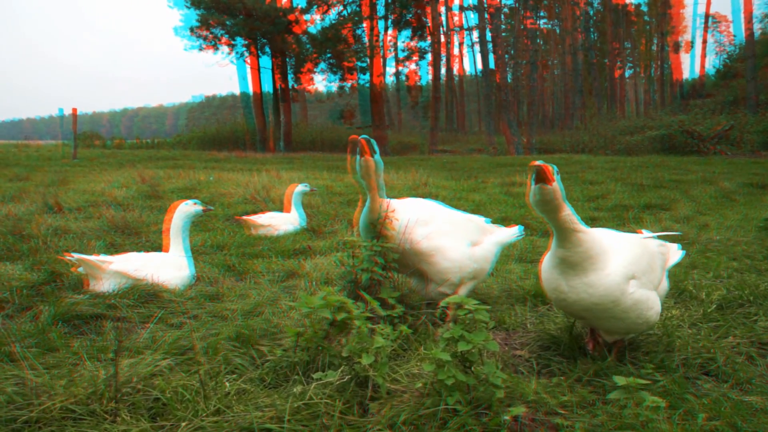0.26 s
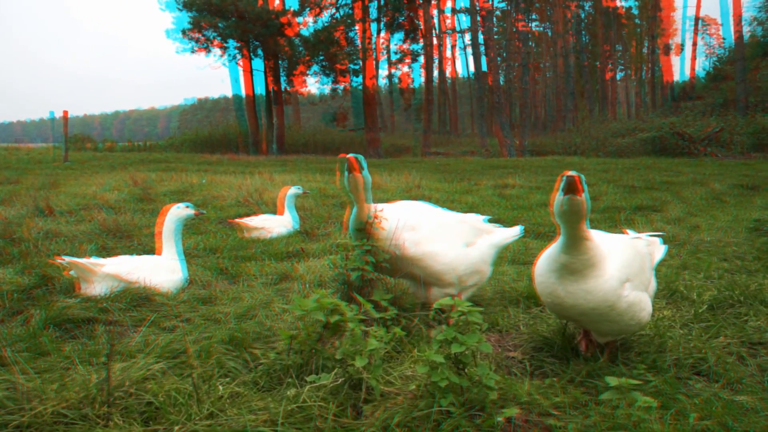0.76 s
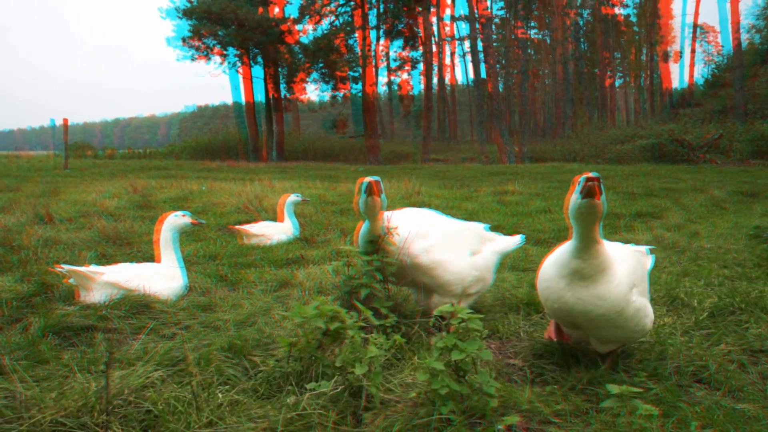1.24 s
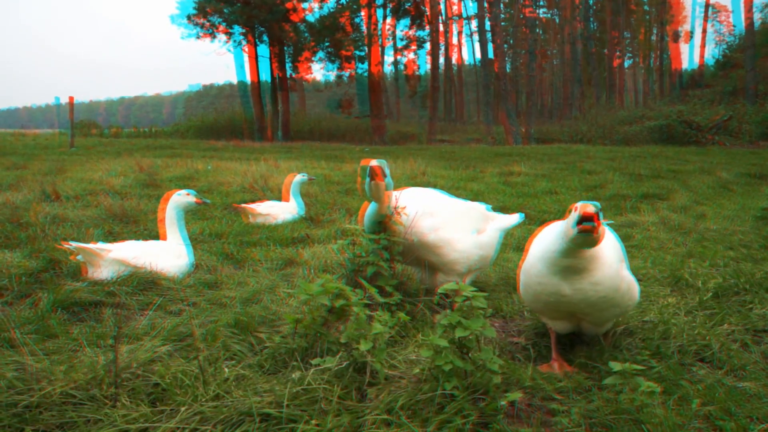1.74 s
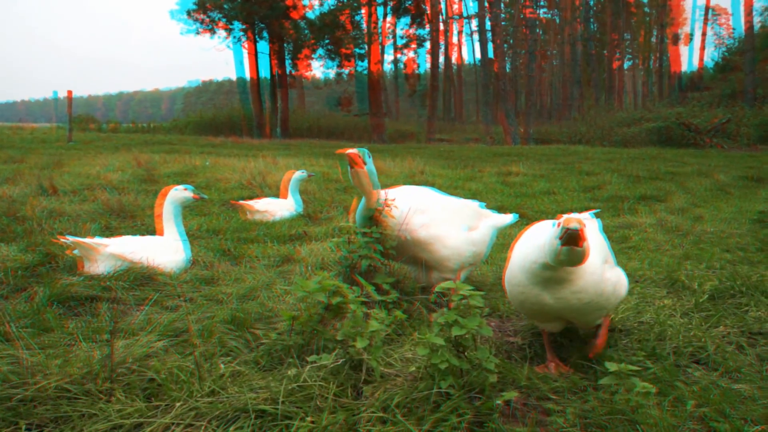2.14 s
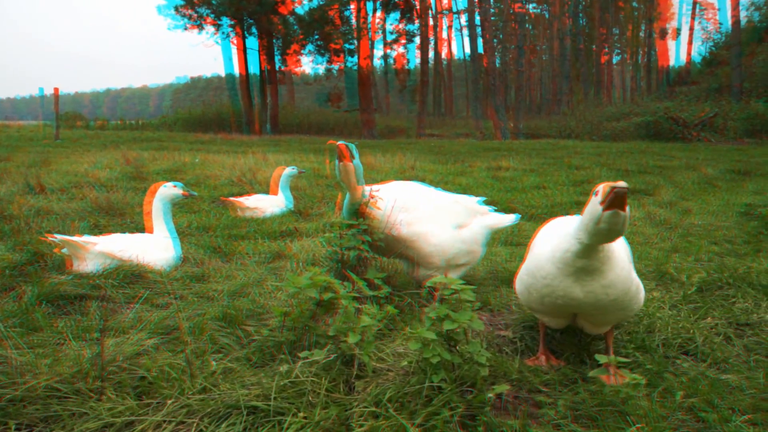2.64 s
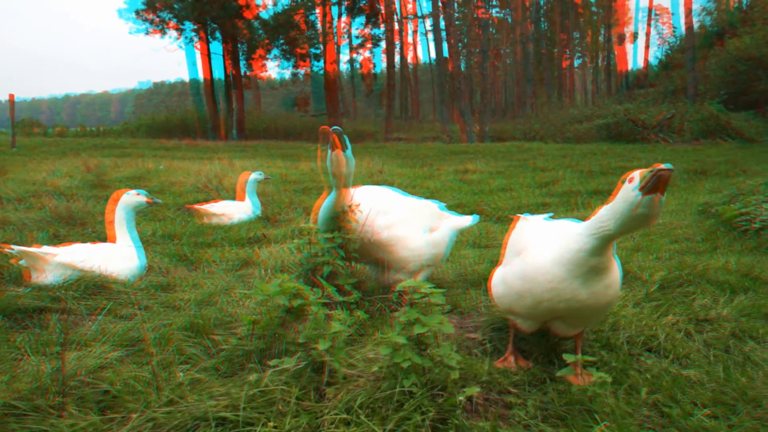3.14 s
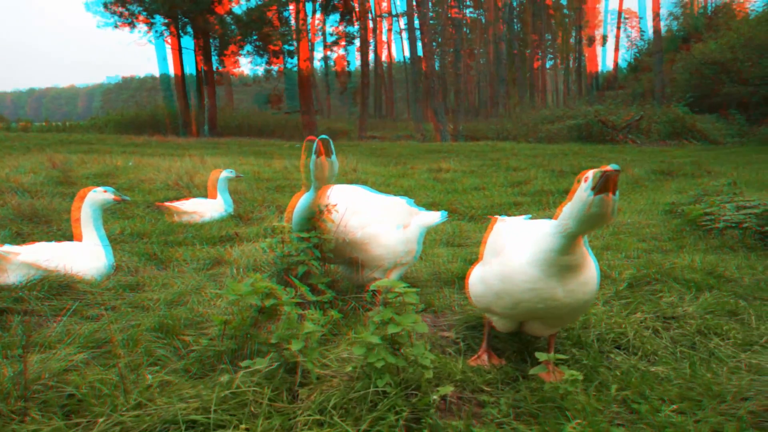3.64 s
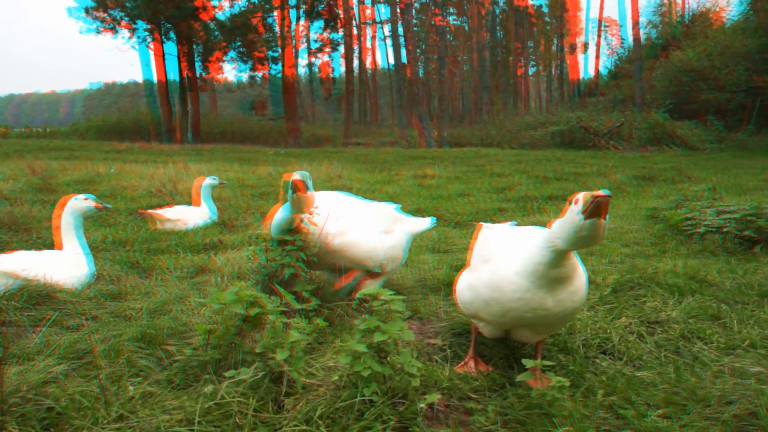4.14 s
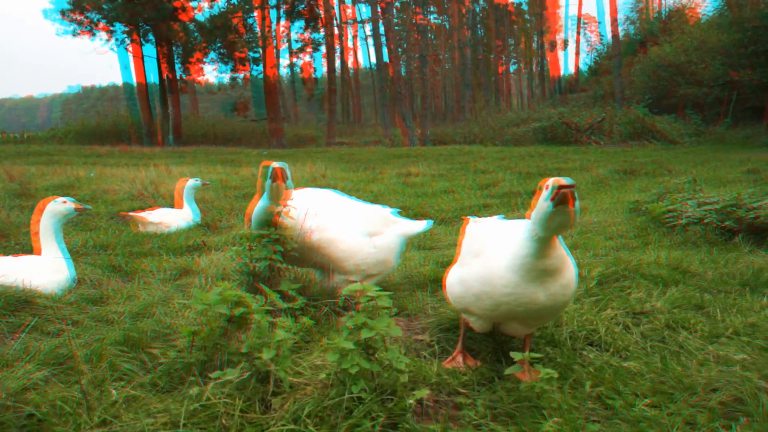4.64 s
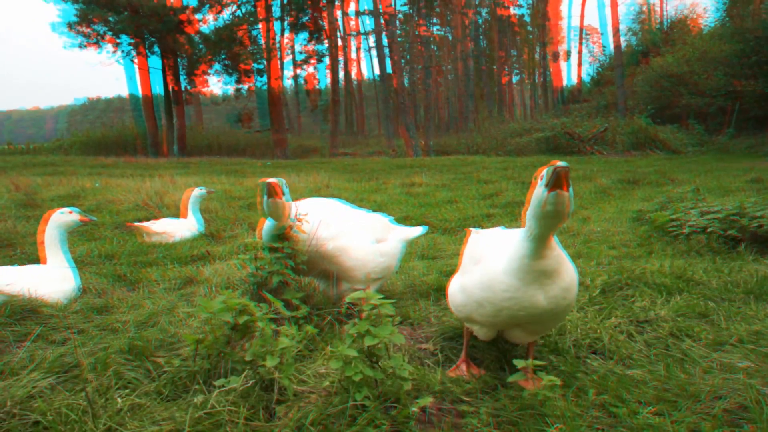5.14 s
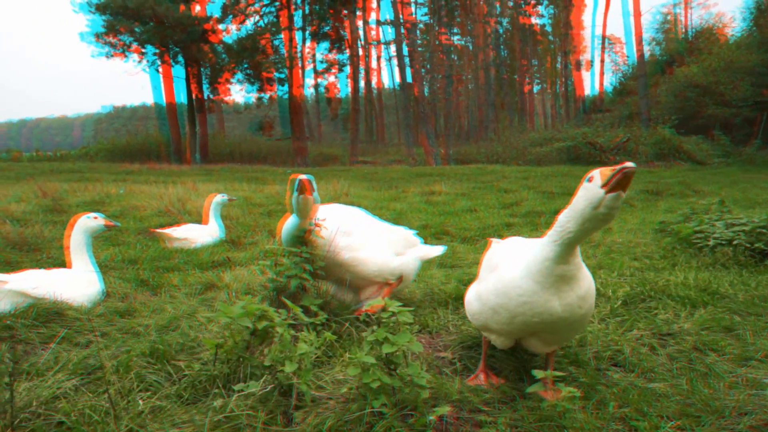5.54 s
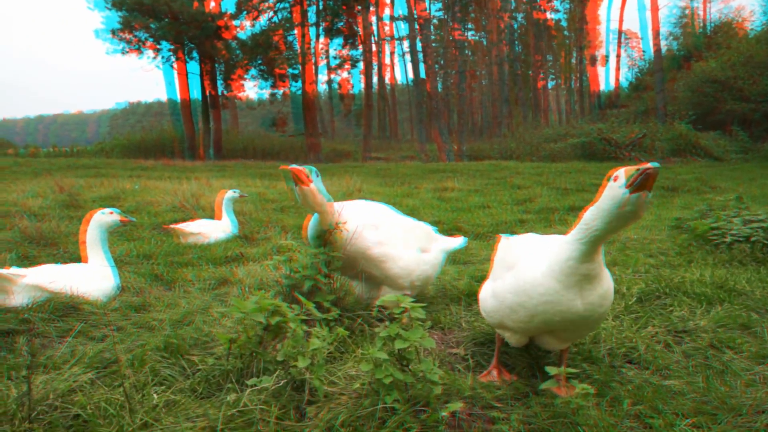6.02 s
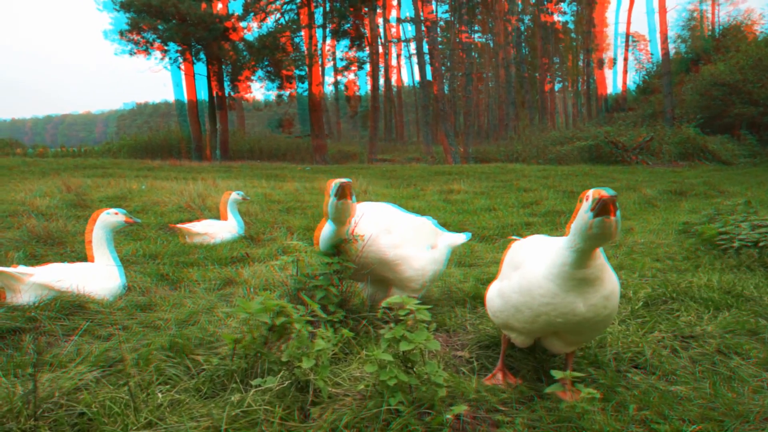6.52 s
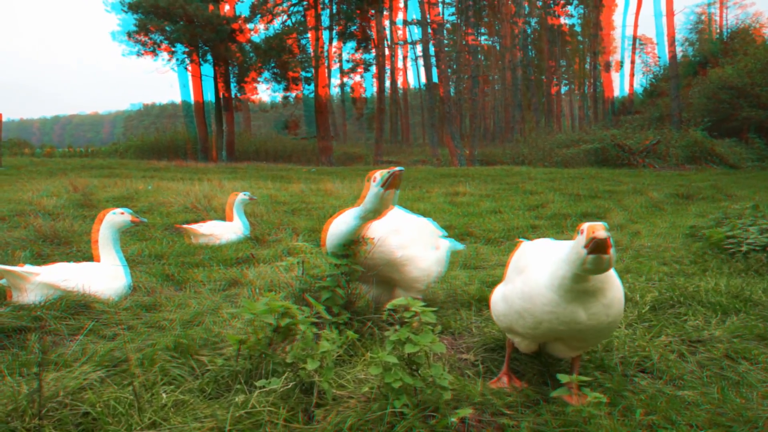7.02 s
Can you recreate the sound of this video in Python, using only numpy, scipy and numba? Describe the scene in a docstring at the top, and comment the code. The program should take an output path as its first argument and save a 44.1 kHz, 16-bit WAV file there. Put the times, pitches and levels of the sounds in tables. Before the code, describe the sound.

Geese in a meadow beside woods, heard close in stereo with a very soft rush of air. At 0 s a clipped yelp, then a hoarse rough bark at 0.15 s. Near quiet follows, with faint far falling bird cries around 0.4, 0.75 and 1.1 s and thin high whistles. A dry stalk snaps at 1.4 s, and low honks and a yelp start a dense cackle lasting to about 3.2 s: buzzy, nasal, short honks, the nearest goose right, a lower voice near centre, with small squeaks. Then quiet, faint bird notes at 3.4 s, soft crackles near 4 s, and complete silence from 4.2 to 4.8 s. The second bout begins with softer left calls, then rapid overlapping honks, squeaks at 6.05 and 6.3 s, a harsh shriek at 6.5 s, strong lower honks until 6.95 s, a last yelp near 7.1 s and a distant bird cry at the end.

```python
"""Geese cackling at the edge of a wood

Domestic geese honk in two bouts: the nearest on the right about seven times a second, a lower voice in the
middle, a softer one on the left, and one hoarse bark. Each honk is a train of pulses and puffs that rings
throat resonances. Voices that break into yelps, squeaks or a shriek, and far birds, are sums of overtones.
Crackles and the rush of air are coloured noise; trees echo. Between the bouts the sound fades to silence."""
import sys
import numpy as np
from scipy import signal
from scipy.fft import rfft, irfft
from scipy.io import wavfile
from numba import njit

SR = 44100
rng = np.random.default_rng(int(sys.argv[2]) if len(sys.argv) > 2 else 0)


def master_out(mix):
    """Clip the mix to full scale and print it as 16-bit PCM to the path in sys.argv[1]."""
    frames = np.transpose(np.atleast_2d(mix))
    ceiling = np.clip(frames, -1, 1)
    pcm = np.round(ceiling * 32767).astype(np.int16)
    wavfile.write(sys.argv[1], SR, pcm)


N = 320607   # length in samples
CUTOFF_HZ = 16200   # nothing is kept above this


def from_db(db):
    """Turn decibels into a gain."""
    return 10 ** (np.asarray(db) / 20)


def rms_one(x):
    """Scale to unit power."""
    return x / np.sqrt(np.mean(x ** 2) + 1e-20)


def in_time(rows):
    """Join (seconds, value) rows by straight lines."""
    return np.interp(np.arange(N) / SR, *np.transpose(rows))


def noise(spectrum, size):
    """Noise of unit power whose colour follows (Hz, dB) rows."""
    hz, db = np.transpose(spectrum)
    bins = np.maximum(np.fft.rfftfreq(size, 1 / SR), 1)
    colour_db = np.interp(np.log(bins), np.log(hz), db)
    white = rng.standard_normal(size)
    return rms_one(irfft(rfft(white) * from_db(colour_db), size))


def wander(size, rate):
    """Random values around 0, drawn `rate` times a second and joined by straight lines."""
    at = np.arange(size) * rate / SR
    return np.interp(at, np.arange(400), rng.standard_normal(400))


def add(out, start, sound, pan_db):
    """Mix a sound into the stereo track at its time and side; positive pan_db is left."""
    at = round(start * SR) + np.arange(len(sound))
    inside = (at >= 0) & (at < N)
    sides = from_db([[pan_db / 2], [-pan_db / 2]])
    out[:, at[inside]] += sides / sides.mean() * sound[inside]


@njit
def resonate(x, hz, width, sr):
    """A resonance of peak gain about 1 whose centre can move from sample to sample."""
    r = np.exp(-np.pi * width / sr)
    y = np.zeros(len(x))
    for i in range(2, len(x)):
        push = (1 - r * r) / 2 * (x[i] - x[i - 2])
        y[i] = push + 2 * r * np.cos(2 * np.pi * hz[i] / sr) * y[i - 1] - r * r * y[i - 2]
    return y


def arch(u, crest_hz, final_hz, scoop, crest_at=.25):
    """Pitch scoops up over the first part of a call (u runs 0 to 1), then sags ever faster."""
    crest_at = np.clip(crest_at, .1, .7)
    up = np.clip(1 - u / crest_at, 0, 1)
    down = np.clip((u - crest_at) / (1 - crest_at), 0, 1)
    return crest_hz * (1 - scoop * up ** 2) - (crest_hz - final_hz) * down ** (3 / 2)


def swell(t, length, rise, fall):
    """Rounded attack and release, with times in seconds."""
    attack = np.sin(np.pi / 2 * np.clip(t / rise, 0, 1)) ** 2
    release = np.sin(np.pi / 2 * np.clip((length - t) / fall, 0, 1)) ** 2
    return attack * release


def near_goose():
    """The nearest goose, on the right, has the highest pulse rate of the honking voices."""
    # Each row: start in seconds, length in seconds, level in dB before attack and release.
    honks = [(1.858, 0.13, -25.5), (2.002, 0.12, -25), (2.151, 0.13, -22), (2.312, .111, -22),
             (2.424, 0.12, -21), (2.54, .14, -20), (2.676, .13, -20.5), (2.834, .11, -20),
             (3.067, 0.11, -23), (4.966, 0.1425, -19), (5.16, 0.13, -21), (5.276, 0.15, -20),
             (5.43, 0.14, -21), (5.553, .14, -20.5), (5.7, .143, -20.5), (5.824, 0.14, -21),
             (6.091, .129, -20), (6.238, 0.1, -21.5), (6.35, 0.099, -21.5), (6.522, 0.064, -30.5),
             (6.747, 0.11, -22), (6.937, 0.078, -21.5)]
    # Pitch at the crest and its sag, the honk length with the usual beak opening, attack and release.
    shape = dict(crest_hz=162.35, sag_hz_per_s=115, usual_s=0.18, attack_s=0.015, release_s=0.026)
    # Throat resonances. Each row: centre in Hz, width in Hz, drive in dB, share of beak movement from 0 to 1.
    throat = [(165, 33, -9, 0), (506, 18.2, 3.5, 0.3), (944.5, 137, 0, 0.43), (1136.6, 61, 0, 0.33),
              (1885, 110, -3.5, 0.21), (2280, 110, -5.5, 0.4), (2740, 137, -4.5, 0), (3395, 42.6, -9, 0.2),
              (4346, 160, -9.5, 0.29), (5700, 1340, -20, 1), (6570, 160, -21, 0.4), (7820, 170, -19.5, 0),
              (11210, 2200, -36, 0.05)]
    return goose(honks, shape, throat, beak_hz=1172, pan_db=-9.0, jitter=.007, edge_jitter=.05,
                 rasp=1.0, closing=.3, dull_db=-15, shimmer_db=0.55, rasp_cycles=1.0, rasp_hz=4770,
                 rebound=0.67, shut_db=-1.0)


def middle_goose():
    """A lower voice near the middle has stronger, shorter puffs and a less mobile beak than the nearest."""
    # Each row: start in seconds, length in seconds, level in dB before attack and release.
    honks = [(1.443, 0.049, -28.5), (1.708, 0.059, -37), (1.745, 0.078, -21.5), (1.805, 0.12, -21.5),
             (1.913, 0.13, -22.5), (2.015, 0.1, -22.5), (2.108, 0.11, -25), (2.29, .07, -25),
             (2.402, 0.063, -25), (2.529, 0.064, -29), (2.657, 0.07, -30), (2.945, .06, -22.5),
             (2.992, 0.11, -21), (3.087, 0.11, -27.5), (5.081, 0.078, -26.5), (5.157, 0.15, -24.5),
             (5.375, 0.12, -25), (5.478, 0.12, -26), (5.588, .09, -27), (5.666, 0.11, -23.5),
             (5.77, 0.11, -25), (5.947, 0.064, -28), (6.075, 0.052, -27.5), (6.32, 0.052, -28),
             (6.603, 0.065, -21.5), (6.656, 0.12, -19.5), (6.753, 0.12, -22.5), (6.844, 0.11, -20.5)]
    # Pitch at the crest and its sag, the honk length with the usual beak opening, attack and release.
    shape = dict(crest_hz=138.04, sag_hz_per_s=50, usual_s=0.094, attack_s=0.012, release_s=.02)
    # Throat resonances. Each row: centre in Hz, width in Hz, drive in dB, share of beak movement from 0 to 1.
    throat = [(163, 35, -4, 0), (427.3, 13, -6.5, 0.32), (576, 120, -6.5, 0.21), (733, 67, -6.5, 0.58),
              (832.4, 104, 1.5, 0.97), (963, 94, -17.5, 1), (1540, 100, -5, 0.55), (2091, 120, -5, 0.15),
              (2579, 100, -11, 0.4), (3745, 470, -14.5, .2), (5720, 3140, -26, 0.98), (7200, 900, -42, 1),
              (10970, 2900, -39.5, 0.23)]
    return goose(honks, shape, throat, beak_hz=834.0, pan_db=-2, jitter=.008, edge_jitter=.025,
                 rasp=2.4, closing=0.18, dull_db=-15.5, shimmer_db=0.94, rasp_cycles=0.55, rasp_hz=3260,
                 rebound=0.6, shut_db=-1.0)


def left_goose():
    """Softer nasal calls from the left, with strong puffs and a pitch that is rough throughout."""
    # Each row: start in seconds, length in seconds, level in dB before attack and release.
    honks = [(4.785, 0.051, -44), (4.82, 0.064, -28), (4.862, 0.14, -28), (4.965, 0.11, -27),
             (5.103, 0.074, -26.5), (5.377, 0.11, -27.5), (7.098, 0.068, -34), (7.177, 0.0357, -26.5)]
    # Pitch at the crest and its sag, the honk length with the usual beak opening, attack and release.
    shape = dict(crest_hz=155.9, sag_hz_per_s=48.5, usual_s=0.095, attack_s=0.017, release_s=0.014)
    # Throat resonances. Each row: centre in Hz, width in Hz, drive in dB, share of beak movement from 0 to 1.
    throat = [(173, 56, -7.5, 0), (631, 18, 5, 0), (956, 300, 1, 1), (1488, 110, 2, 0.95),
              (1587, 180, -2, 0.59), (2310, 530, -15, 0), (3580, 420, -17, 0), (7760, 370, -43.5, 0),
              (10100, 990, -37.5, 0)]
    return goose(honks, shape, throat, beak_hz=1063, pan_db=5.0, jitter=0.0523, edge_jitter=0.021,
                 rasp=3.4, closing=0.11, dull_db=0, shimmer_db=1.0, rasp_cycles=1.0, rasp_hz=2960,
                 rebound=0.63)


def hoarse_bark():
    """One hoarse bark: rough pulses of very uneven strength, with weak rebounds."""
    # Each row: start in seconds, length in seconds, level in dB before attack and release.
    barks = [(.151, .07, -27.5)]
    # Pitch at the crest and its sag, the bark length with the usual beak opening, attack and release.
    shape = dict(crest_hz=131.3, sag_hz_per_s=100, usual_s=.07, attack_s=0.03, release_s=0.033)
    # Throat resonances. Each row: centre in Hz, width in Hz, drive in dB, share of beak movement from 0 to 1.
    throat = [(381, 18, 1, 0.041), (543, 28, 5.5, 0), (757, 100, -1, .3), (1470, 450, -10, 0.03),
              (1990, 64, -5, 0.05), (2470, 180, -7.5, 0.066), (3750, 330, -11, 0), (6650, 980, -21, 0),
              (9650, 3800, -29, 0)]
    return goose(barks, shape, throat, beak_hz=775, pan_db=2, jitter=.04, edge_jitter=0.056,
                 rasp=2.2, closing=0.19, dull_db=-17, shimmer_db=2.5, rasp_cycles=1.0, rasp_hz=1478,
                 rebound=0.36)


def goose(honks, shape, throat, beak_hz, pan_db, jitter, edge_jitter, rasp, closing, dull_db, shimmer_db,
          rasp_cycles, rasp_hz, rebound, shut_db=0):
    """Pulses ring in the windpipe; the opening beak lifts and brightens its resonances over each honk."""
    beak_widening = 0.092   # a longer honk opens the beak wider: resonances rise with this power of length
    out = np.zeros((2, N))
    for start, length, level_db in honks:
        t = np.arange(int(length * SR)) / SR
        u = t / t[-1]
        # how far the beak is shut: 1 at either end, near 0 in the middle
        shut = np.clip(1 - u / 0.46, 0, 1) ** 2 + np.clip((u - .45) / 0.42, 0, 1) ** 2
        shift = (length / shape["usual_s"]) ** beak_widening * (1 - closing * shut)
        final_hz = shape["crest_hz"] - shape["sag_hz_per_s"] * length
        pitch = arch(u, shape["crest_hz"], final_hz, .08)
        rough = jitter + edge_jitter * shut   # rougher at either end than at the crest
        slaps, puffs = syrinx(pitch, rough, shimmer_db, rasp, rasp_cycles, beak_hz * shift, rebound)
        voice = windpipe(slaps, puffs, throat, shift, dull_db * shut, rasp_hz)
        voice = rms_one(voice * from_db(shut_db * shut))
        voice = voice * swell(t, length, shape["attack_s"], shape["release_s"])
        add(out, start, from_db(level_db) * voice, pan_db)
    return out


def syrinx(pitch, rough, shimmer_db, rasp, rasp_cycles, flutter_hz, rebound, count=4):
    """Each cycle the membranes slap shut and rebound, ever weaker, and let out a puff of turbulent air."""
    size = len(pitch)
    phase = np.cumsum(pitch * (1 + rough * wander(size, 170))) / SR + .7   # in cycles
    slaps = np.zeros(size)
    for k in range(count):
        # the time each rebound takes wavers
        bounce = phase - k * pitch / flutter_hz * (1 + 0.055 * wander(size, 120))
        at = np.flatnonzero(np.diff(np.floor(bounce)) > 0)
        # share each slap between two samples, as it falls between them
        late = (np.ceil(bounce[at]) - bounce[at]) / (bounce[at + 1] - bounce[at])
        slaps[at] += (1 - late) * rebound ** k
        slaps[at + 1] += late * rebound ** k
    puffs = rng.standard_normal(size) * np.exp(-(phase % 1) / rasp_cycles)
    strength = from_db(shimmer_db * wander(size, 150))
    return rms_one(slaps) * strength, rasp * rms_one(puffs) * strength ** 2


def windpipe(slaps, puffs, throat, shift, shade_db, rasp_hz):
    """Slaps and puffs ring every throat resonance; the bending neck makes the upper ones waver."""
    size, voice = len(slaps), 0
    for hz, width, db, share in throat:
        # turbulence and the beak's shading act mostly on the upper resonances
        treble = hz / (hz + rasp_hz)
        drive = (slaps + treble * puffs) * from_db(db + shade_db * treble)
        lowpass = signal.butter(2, min(3.52 * hz, .4 * SR), fs=SR, output="sos")
        drive = signal.sosfilt(lowpass, drive)
        # upper resonances waver in pitch and strength, and answer up to 2 ms late
        bend = hz ** 2 / (hz ** 2 + 2500 ** 2)
        delay = int(rng.uniform(0, .002) * bend * SR)
        drive = np.roll(drive, delay) * from_db(3 * bend * wander(size, 35))
        centre = hz * shift ** share * (1 + .03 * bend * wander(size, 25))
        voice = voice + resonate(drive, centre, float(width), SR)
    return voice


def windpipe_hollow(x, hz, q):
    """A pipe closed at one end swallows the octave of its lowest resonance."""
    return signal.lfilter(*signal.iirnotch(hz, q, fs=SR), x)


def breaking_voices():
    """A goose jumps to its high register: a sagging yelp, a short squeak or an arched shriek."""
    # Clear yelps. Each row: start in seconds, length in seconds, level in dB before attack and release,
    # crest pitch in Hz, left-right balance in dB, beak resonance in Hz.
    yelps = [(-.04, 0.094, -36, 543.6, 3.5, 1184), (1.523, 0.089, -24, 427, -3, 787),
             (2.28, 0.049, -28.5, 564.6, -1.5, 608), (2.399, .052, -27.5, 585, -3, 603),
             (7.135, 0.11, -30, 494, 3.5, 980)]
    # Whistling squeaks as a voice catches.
    # Each row: start in seconds, level in dB before attack and release, left-right balance in dB.
    squeaks = [(1.732, -26, 6), (2.936, -27, 8), (6.051, -19, -4.5), (6.305, -19, -4)]
    # A harsh, arched shriek. Each row: start in seconds, length in seconds,
    # level in dB before attack and release, crest pitch in Hz, left-right balance in dB.
    shrieks = [(6.501, 0.073, -21, 810, -10)]
    out = np.zeros((2, N))
    for start, length, level_db, hz, pan_db, beak_hz in yelps:
        yelp = clear_tone(length, hz, sag=.13, scoop=.07, slope_db=-5.0, jitter=.016, flutter=0.078,
                          attack_s=0.028, release_s=.027, beak_hz=beak_hz, beak_db=16)
        add(out, start, from_db(level_db) * yelp, pan_db)
    for start, level_db, pan_db in squeaks:
        squeak = clear_tone(0.045, 2056, sag=0.016, scoop=0.015, slope_db=-15.5, jitter=0.0066, flutter=0.21,
                            attack_s=0.035, release_s=.026)
        add(out, start, from_db(level_db) * squeak, pan_db)
    for start, length, level_db, hz, pan_db in shrieks:
        shriek = clear_tone(length, hz, sag=.08, scoop=0.169, slope_db=-3.5, jitter=.016, flutter=0.34,
                            attack_s=0.019, release_s=.028, beak_hz=800, beak_db=-2.5, crest_at=0.49)
        add(out, start, from_db(level_db) * shriek, pan_db)
    return out


def clear_tone(length, crest_hz, sag, scoop, slope_db, jitter, flutter, attack_s, release_s,
               beak_hz=0, beak_db=0, beak_width_hz=150, waver=0, crest_at=.33):
    """A nearly periodic tone: overtones weaken upwards, and the beak lifts or dims those near beak_hz."""
    t = np.arange(int(length * SR)) / SR
    pitch = arch(t / t[-1], crest_hz, crest_hz * (1 - sag), scoop, crest_at)   # sag: share of the pitch lost
    pitch = pitch * (1 + jitter * wander(len(t), 680) + waver * wander(len(t), 25))
    phase, voice = 2 * np.pi * np.cumsum(pitch) / SR, 0
    for k in range(1, int(CUTOFF_HZ / crest_hz) + 1):
        lift_db = beak_db / (1 + ((k * pitch - beak_hz) / beak_width_hz) ** 2)
        gain = from_db(slope_db * np.log2(k) + lift_db)   # slope_db per octave
        gain = gain / (1 + (k * crest_hz / 5500) ** 3)
        uneven = 1 + flutter * np.sqrt(k) * wander(len(t), 830)
        voice = voice + gain * np.sin(k * phase) * uneven
    return rms_one(voice) * swell(t, length, attack_s, release_s)


def crackles():
    """Short, crackly bursts of noise that die away, most of them like grass stalks snapping."""
    # The first is a faint burst of noise just ahead of the bark; the others are stalks snapping underfoot.
    # Each row: start in seconds, level in dB at the start, time in seconds to die by 60 dB.
    bursts = [(0.13, -53.5, .2), (1.368, -29, 0.021), (1.407, -50.5, .05), (1.678, -51, .05),
              (3.94, -42, 0.043), (3.998, -49, 0.07), (4.064, -56, 0.13)]
    # Colour of a burst. Each row: frequency in Hz, relative level in dB.
    burst_colour = [(200, -4), (800, -25), (1400, -8.5), (2800, -10.5), (5000, -12), (7000, -16.5),
                    (11000, -20), (16000, -28.5)]
    out = np.zeros((2, N))
    t = np.arange(SR // 5) / SR
    for start, level_db, t60 in bursts:
        crackle_db = 1.4 * wander(len(t), 400)
        burst = noise(burst_colour, len(t)) * from_db(level_db - 60 * t / t60 + crackle_db)
        add(out, start, burst, 0)
    return out


def at_microphones(x, alike_below_hz):
    """Long waves reach both close-set microphones equally strongly, so the bass is alike on both sides."""
    mid, side = (x[0] + x[1]) / 2, (x[0] - x[1]) / 2
    side = signal.sosfiltfilt(signal.butter(1, alike_below_hz, "high", fs=SR, output="sos"), side)
    # the top treble is also nearly even
    side = signal.sosfiltfilt(signal.butter(1, 4500, fs=SR, output="sos"), side)
    # the two microphone ports ring a little differently in the treble
    port_hz, port_width_hz, port_db = 8000.0, 2600.0, -10
    side = side + from_db(port_db) * resonate(mid, np.full(N, port_hz), port_width_hz, SR)
    return np.array([mid + side, mid - side])


def wood(x, t60, echo_db):
    """Countless trunks scatter a faint, dull echo back, with separate random tails for left and right."""
    # Colour of the echo from the trees. Each row: frequency in Hz, relative level in dB.
    wood_colour = [(100, -19.5), (400, 0.5), (1100, -3), (2400, 0), (5000, -15), (12000, -10)]
    t = np.arange(SR) / SR
    tail = from_db(-60 * t / t60) * (1 - np.exp(-t / 0.0039))   # quick build-up, then decay
    echoes = []
    for _ in range(2):
        scatter = rms_one(noise(wood_colour, SR) * tail) / np.sqrt(SR)
        echoes.append(signal.fftconvolve(x, scatter)[:N])
    return from_db(echo_db) * np.array(echoes)


def far_birds():
    """One bird repeats a falling cry far away; a songbird adds thin, almost level whistles."""
    # Falling cries. Each row: start in seconds, length in seconds, level in dB before attack, release and
    # echo, share of the pitch lost by the end.
    far_cries = [(0.399, 0.177, -64.5, 0.062), (0.743, .22, -61.5, .12), (1.115, .22, -60.5, .045),
                 (7.218, 0.3, -45.5, 0.042)]
    # Thin songbird notes.
    # Each row: start in seconds, level in dB before attack, release and echo, crest pitch in Hz.
    bird_notes = [(.82, -74, 6500), (.95, -70, 6960), (1.07, -68, 6960), (1.2, -66, 6780), (3.4, -73, 7100),
                  (3.52, -74, 7000)]
    out = np.zeros((2, N))
    for start, length, level_db, sag in far_cries:
        cry = clear_tone(length, 1230, sag, scoop=.01, crest_at=.12, slope_db=-10, jitter=.012, flutter=0.28,
                         attack_s=0.012, release_s=0.077, waver=0.0077)
        add(out, start, from_db(level_db) * cry, 0)
    for start, level_db, hz in bird_notes:
        note = clear_tone(0.095, hz, sag=0.024, scoop=0.031, slope_db=-29, jitter=0.0098, flutter=0.53,
                          attack_s=.025, release_s=0.029, waver=.008)
        add(out, start, from_db(level_db) * note, 0)
    return out + wood(out[0], t60=.7, echo_db=-5.5)


def air(width):
    """The quiet rush of the open meadow: noise shared by both sides plus noise opposite on each."""
    # Colour of the meadow air. Each row: frequency in Hz, relative level in dB per Hz.
    air_colour = [(15, -46), (25, -11), (66, 0.5), (256, 2), (344, -2.5), (641, -9), (1130, -8.5),
                  (1840, -13), (2220, -15), (6740, -17.5), (9840, -22.5), (11900, -17), (16000, -18.5)]
    # Loudness of the whole rush of air over time. Each row: time in seconds, gain in dB.
    air_level = [(0, -60.5), (1.0, -67), (1.3, -59), (3.2, -58), (3.5, -68), (3.85, -66), (4.02, -55),
                 (4.15, -66), (4.8, -57.5), (7.27, -63)]
    shared = noise(air_colour, N)
    opposite = width * noise(air_colour, N) * [[1], [-1]]
    return from_db(in_time(air_level)) * (shared + opposite)


def scene():
    """The flock, its echo from the wood, the far birds and the meadow air."""
    honks = windpipe_hollow(near_goose() + middle_goose() + left_goose(), hz=296, q=2.6)
    flock = honks + hoarse_bark() + breaking_voices() + crackles()
    flock = at_microphones(flock, alike_below_hz=220)
    echo = wood(flock.mean(axis=0), t60=0.43, echo_db=-29.5)
    return flock + echo + far_birds() + air(width=0.86)


def record(dry):
    """Round the peaks, fade out and in again between the bouts, and remove the highest treble."""
    top = .5   # level that the rounded peaks approach
    rounded = top * np.tanh(dry / top)
    soft = signal.sosfilt(signal.butter(3, 12500, fs=SR, output="sos"), rounded)
    silent_from_s, silent_until_s, fade_s = 4.205, 4.78, 0.047
    t = np.arange(N) / SR
    fade = np.clip(np.maximum(silent_from_s - t, t - silent_until_s) / fade_s, 0, 1)
    return signal.sosfilt(signal.ellip(10, .1, 90, CUTOFF_HZ, fs=SR, output="sos"), soft * fade)


dry = scene()
out = record(dry)
master_out(out)
```